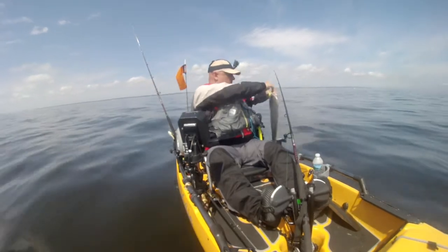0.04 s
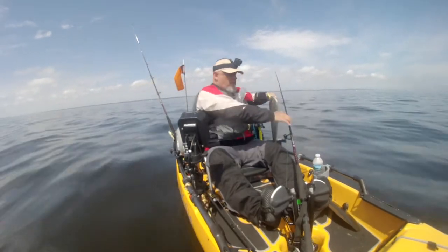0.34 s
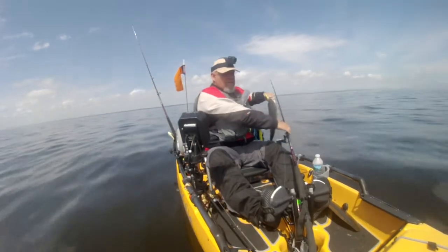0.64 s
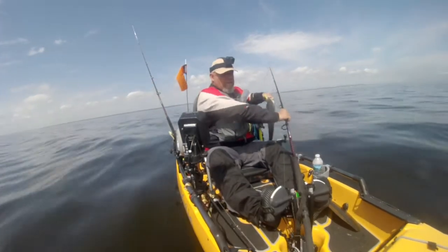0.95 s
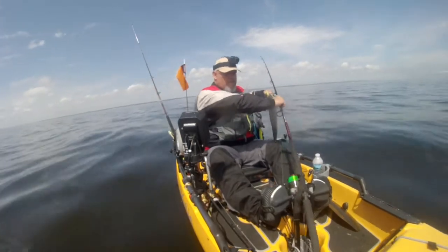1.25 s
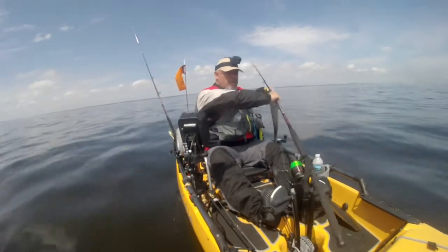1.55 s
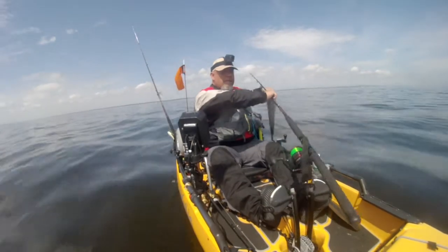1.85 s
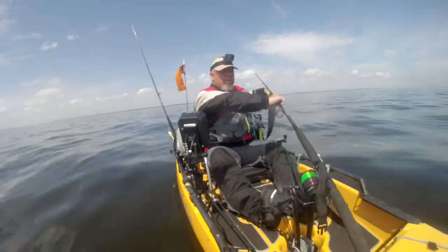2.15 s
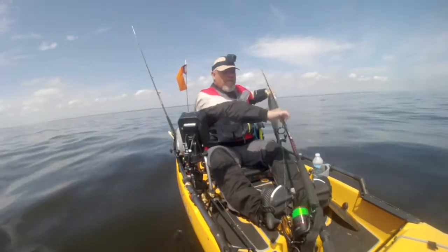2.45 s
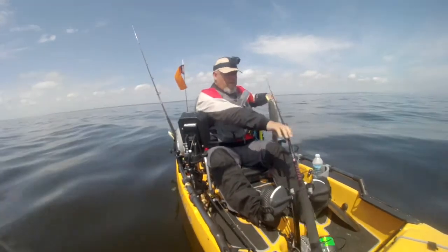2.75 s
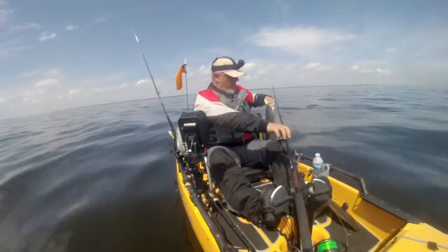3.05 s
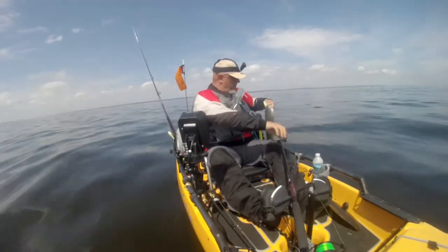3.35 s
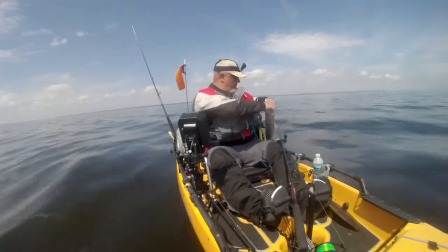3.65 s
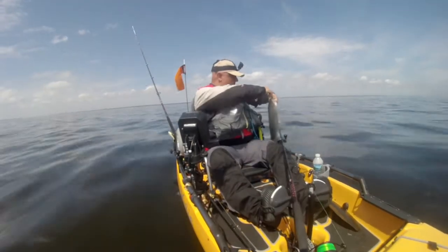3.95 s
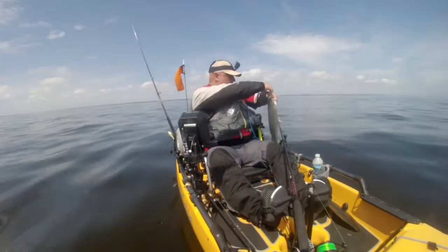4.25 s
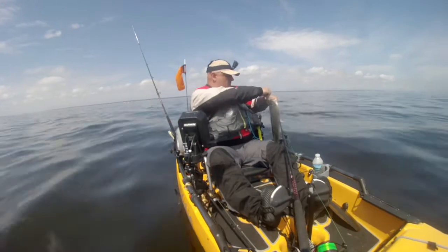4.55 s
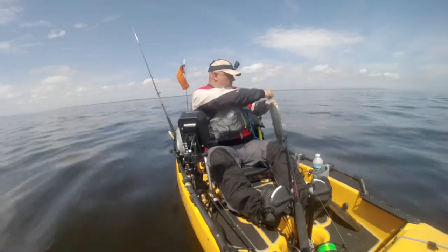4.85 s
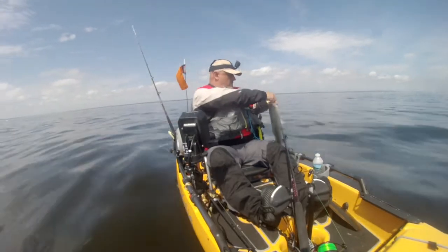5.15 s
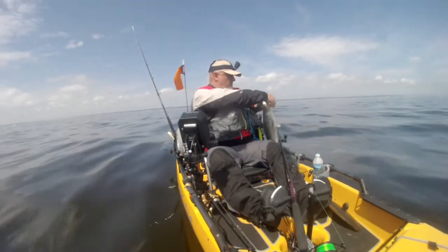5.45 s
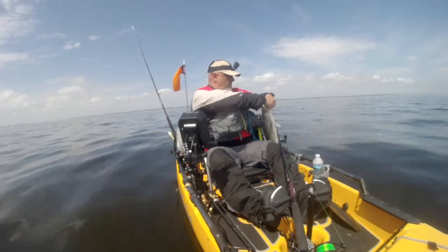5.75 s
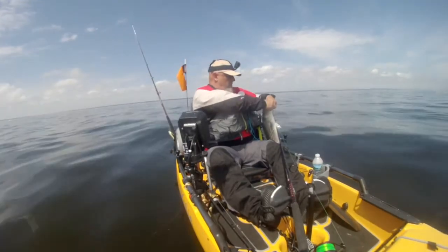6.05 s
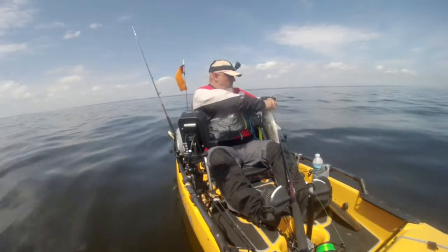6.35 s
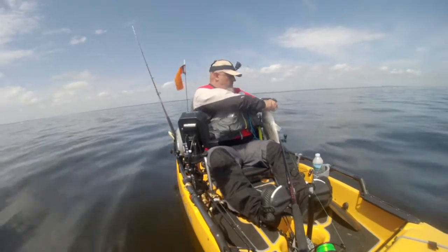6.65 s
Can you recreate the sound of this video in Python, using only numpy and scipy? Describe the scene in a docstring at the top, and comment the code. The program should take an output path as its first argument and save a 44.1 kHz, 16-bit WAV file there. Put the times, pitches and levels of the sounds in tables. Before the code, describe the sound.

Hollow knocks, clacks and scrapes of fishing gear against a plastic kayak, thinning to light taps and creaks over faint ripples.

```python
"""Hollow thuds and sharp clacks sound from a plastic kayak on calm water, as an angler holding a fish
shifts a rod and gear about. Each knock excites the damped modes of hull, deck and fittings and travels
up a swaying pole into a closed camera housing. Between the blows, gear and clothing rub on the boat,
grips creak by stick-slip friction and loose tackle rattles, over a faint wash of ripples."""
import sys
import numpy as np
from scipy import signal
from scipy.fft import rfft, irfft, next_fast_len
from scipy.io import wavfile
from scipy.ndimage import uniform_filter1d, map_coordinates

SR = 44100
rng = np.random.default_rng(int(sys.argv[2]) if len(sys.argv) > 2 else 0)


def wav_record(signal):
    """Record a signal, one row per channel, as 16-bit PCM in the file named by sys.argv[1]."""
    frames = np.transpose(np.atleast_2d(signal))
    bounded = np.clip(frames, -1, 1)
    # unit amplitude maps onto the largest positive 16-bit level
    quanta = np.round(bounded * 32767).astype(np.int16)
    wavfile.write(sys.argv[1], SR, quanta)


N = 295470

# Spectra of the noises. Each row: frequency in Hz, relative spectral level in dB.
AIR_SPECTRUM = [(18, -33), (30, -5), (46, 1), (75, -11.5), (138, -7), (199, -4.5), (239, -22), (355, -18),
                (569, -20), (2170, -29), (2610, -27.5), (4650, -33.5), (11700, -37.5), (14800, -42),
                (16000, -57)]
RUMBLE_SPECTRUM = [(30, -9), (62, 6.5), (100, 5.5), (150, -0.5), (210, -1), (285, 1.5), (340, -23.5),
                   (410, -9.5), (520, -33.5), (1000, -46), (3000, -84.5)]
TACKLE_SPECTRUM = [(1500, -42), (3000, -11), (4800, -3.5), (5900, -3), (7000, -17.5), (8200, -4),
                   (9500, -7.5), (11500, -2.5), (13000, -13), (15500, -15)]
SCRAPE_SPECTRUM = [(250, -11), (450, -5), (600, 1), (850, 0.5), (1050, -8.5), (1250, 1), (1480, -10),
                   (1750, -21.5), (3500, -34), (15000, -56.5)]
RASP_SPECTRUM = [(900, 9), (1700, 10), (2150, -16), (2750, 12), (3100, 4), (3500, -36), (6000, -25.5),
                 (10000, -28), (15000, -39)]
CRACK_SPECTRUM = [(1000, -42.5), (2000, -11.5), (2700, 4.5), (3500, -15), (4500, -5), (6000, -6.5),
                  (7200, -10.5), (9000, -14.5), (11400, -12), (15500, -25)]
# Normal modes. Each row: frequency in Hz, relative level in dB, time to decay by 60 dB in seconds.
HULL_MODES = [(74.2, -14, 0.26), (89, -12.5, 0.06), (125.74, -19, .12), (159.55, -0.5, 0.28),
              (185.9, -6, 0.2), (213, -20.5, .14), (239, -15, 0.21), (273, -17.5, 0.13), (278, -6, 0.17),
              (394, -7.5, .085)]
DECK_MODES = [(534, -5, 0.015), (575, -4.5, 0.044), (650, 2.5, .022), (735, 1.5, .032), (833, -2, .024),
              (867, -6.5, 0.034), (578.3, -33.5, 0.12), (910, -22.5, 0.15)]
HOUSING_MODES = [(960, -19.5, .022), (1127, -1, 0.055), (1192, 9.5, .024), (1277, 9.5, 0.019),
                 (1410, -6, 0.016), (1680, -8, 0.006)]
FITTING_MODES = [(1798, 7, .018), (1990, -12, 0.1), (2440, 9, 0.0097), (2670, 4.5, 0.013),
                 (3020, -4.5, 0.029), (3500, -18.5, 0.036), (4177, -19.5, .014), (4730, -15.5, 0.02),
                 (5755, -16, 0.019)]
# Shoves that rock the camera pole. Each row: start in seconds, swing level in dB.
POLE_SHOVES = [(.5, -38), (.8, -31.5), (1.3, -27.5), (1.58, -27.5), (2.41, -17.5), (2.88, -17), (3.47, -15),
               (4.739, -30)]
# Loose tackle shaken by blows. Each row: middle and half length in seconds, level in dB.
TACKLE_RATTLES = [(0.895, 0.0067, -55), (2.413, 0.014, -54), (2.509, 0.0052, -54.5), (2.827, 0.015, -56.5),
                  (2.88, 0.014, -52.5), (3.096, 0.013, -67.5), (3.519, 0.0074, -66)]
# Creaks of plastic and rod grips. Each row: middle and half length in seconds, level in dB, pitch in Hz.
GRIP_CREAKS = [(1.392, 0.0084, -48, 1100), (1.417, 0.0053, -50, 1110), (1.444, 0.005, -44, 1050),
               (2.803, 0.011, -42, 2710), (3.095, 0.0038, -32, 1274), (3.099, 0.011, -41.5, 2700),
               (3.169, 0.0065, -50.5, 2700), (3.178, 0.019, -50.5, 1210), (3.432, 0.048, -63.5, 2620),
               (4.174, 0.013, -45, 1130), (5.37, 0.074, -65, 1250), (5.656, 0.0072, -53.5, 1190),
               (6.448, 0.019, -67, 1276)]
# Gear and clothing dragged over the boat.
# Each row: middle and half length in seconds, scrape level in dB, rumble level in dB.
GEAR_RUBS = [(0.844, 0.011, -61.5, -48.5), (1.397, 0.06, -65, -36.5), (2.617, 0.044, -53, -28),
             (2.725, 0.026, -39, -31.5), (2.808, 0.014, -35, -13.5), (2.869, 0.063, -46, -24),
             (3.11, 0.017, -42, -39), (3.199, 0.077, -57.5, -35.5), (3.441, 0.055, -48, -34),
             (3.493, 0.026, -42, -20.5), (3.594, 0.056, -48.5, -24.5), (4.245, 0.3, -68.5, -51),
             (4.663, .02, -64, -31.5), (4.853, 0.13, -68, -44.5), (5.438, 0.062, -75, -51),
             (5.903, 0.052, -70, -42.5), (6.117, 0.01, -80, -44.5), (6.695, 0.027, -57, -34.5)]
# Light taps of rod and gear. Each row: start in seconds, relative levels of clack and click in dB.
LIGHT_TAPS = [(2.759, -34, -42.5), (2.9926, -31, -37.5), (3.045, -43.5, -52), (3.086, -35, -37),
              (3.161, -39.5, -54), (3.8907, -42, -53.5), (4.6474, -35.5, -46.5), (4.6682, -43.5, -56),
              (4.8022, -39.5, -53.5), (6.668, -35.5, -49)]
# Heavy blows on the boat. Each row: start in seconds, relative thud level in dB, thud pitch in Hz,
# then relative levels of deck knock, housing clack and fitting click in dB.
HEAVY_KNOCKS = [ (0.055, -32.5, 230, -62, -75, -67), (.87, -7, 259.5, -19.5, -26, -38.5),
                (1.242, -26, 202, -34.5, -35, -40), (1.326, -19.5, 205, -36.5, -29, -47),
                (1.453, -21.5, 205, -61, -45, -70), (1.582, -26, 253, -41, -48, -72),
                (2.394, -4.5, 212, -5, -12, -30), (2.4941, -12, 212, -25.5, -37.5, -60),
                (2.588, -20.5, 185, -42, -72, -68), (2.688, -15.5, 197, -34, -50, -63),
                (2.7884, -10.5, 225, -20.5, -19, -33.5), (2.8133, -13, 143, -24, -47, -45),
                (2.8592, -12.5, 206, -17.5, -17.5, -38.5), (2.8858, -12.5, 159, -31, -56.5, -54),
                (3.4433, -24, 276, -37, -30, -45), (3.469, -20, 281, -26.5, -20.5, -24),
                (3.4894, -22, 137, -23, -23.5, -46.5), (3.5252, -31, 143, -27, -25.5, -49),
                (3.571, -34, 192, -35, -32, -47), (3.6018, -26, 179, -46, -38, -52)]


def amp(db):
    """Amplitude ratio of a level in dB."""
    return 10 ** (np.asarray(db) / 20)


def unit(x):
    """x at rms 1."""
    return x / np.sqrt(np.mean(x ** 2) + 1e-20)


def at_level(x, db):
    """x with its loudest 4 ms at db."""
    return x * amp(db) / np.sqrt(np.max(uniform_filter1d(x ** 2, size=176)) + 1e-20)


def since(start):
    """Seconds since start at each sample, 0 before it."""
    return np.maximum(np.arange(N) / SR - start, 0)


def rise(t, seconds):
    """A smooth build-up from 0 to 1."""
    return 1 - np.exp(-(t / seconds) ** 2)


def fade(t, t60):
    """Exponential decay by 60 dB in t60 seconds."""
    return np.exp(-np.log(1000) * t / t60)


def swell(middle, half):
    """A Gaussian envelope of height 1."""
    return np.exp(-.5 * ((np.arange(N) / SR - middle) / half) ** 2)


def wobble(rate):
    """A smooth random curve, rate knots a second."""
    return map_coordinates(rng.standard_normal(int(N * rate / SR) + 4), [np.arange(N) * rate / SR])


def slips(rate, spread_db):
    """A Poisson train of uneven impulses, rate a second."""
    impulses = (rng.random(N) < rate / SR) * rng.choice([-1, 1], N)
    return impulses * amp(spread_db * np.clip(rng.standard_normal(N), -2, 2))


def coloured(x, spectrum):
    """x filtered by a spectral envelope, at rms 1."""
    hz, db = np.transpose(spectrum)
    bins_hz = np.fft.rfftfreq(len(x), 1 / SR)
    gain = amp(np.interp(np.log(bins_hz + 1), np.log(hz), db))
    return unit(irfft(rfft(x) * gain, len(x)))


def band(x, lo_hz, hi_hz, order=3):
    """Causal band-pass."""
    return signal.sosfilt(signal.butter(order, [lo_hz, hi_hz], "band", fs=SR, output="sos"), x)


def placed(sounds):
    """(start in seconds, sound) pairs summed on one track."""
    track = np.zeros(N + SR)
    for start, sound in sounds:
        track[round(start * SR):][:len(sound)] += sound
    return track[:N]


def air():
    """Stationary noise: the faint wash of open water and microphone hiss."""
    return amp(-58.5) * coloured(rng.standard_normal(N), AIR_SPECTRUM)


def ripples():
    """Amplitude-modulated noise: small waves murmur against the hull."""
    return coloured(rng.standard_normal(N), RUMBLE_SPECTRUM) * amp(-57.5 + 3.4 * wobble(16))


def pole():
    """Free vibration: each shove sets the camera pole swinging in its lowest, lightly damped mode."""
    shove_power = sum((amp(db) * rise(since(start), 0.06) * fade(since(start), t60=2.02)) ** 2
                      for start, db in POLE_SHOVES)
    wave_power = amp(-56) ** 2  # the waves keep up a slight swing
    hz = 22.3 + 0.43 * wobble(5.9)
    return np.sqrt(shove_power + wave_power) * unit(np.sin(2 * np.pi * np.cumsum(hz) / SR))


def rattle():
    """Random collisions: loose tackle jumps and ticks in short bursts."""
    shaking = sum(amp(db) * swell(middle, half) for middle, half, db in TACKLE_RATTLES)
    return coloured(slips(rate=200, spread_db=4), TACKLE_SPECTRUM) * shaking


def creaks(relative_bandwidth=0.17):
    """Stick-slip friction at a tight contact drives one narrow resonance per creak."""
    drag = slips(rate=970, spread_db=2.5)
    lower, upper = 1 - relative_bandwidth / 2, 1 + relative_bandwidth / 2
    return sum(amp(db) * swell(middle, half) * unit(band(drag, hz * lower, hz * upper, order=2))
               for middle, half, db, hz in GRIP_CREAKS)


def rubbing():
    """Sliding friction: the same tiny slips scrape the deck and rasp the fittings; the hull rumbles."""
    power = sum((amp(levels_db)[:, None] * swell(middle, half)) ** 2
                for middle, half, *levels_db in GEAR_RUBS)
    scrape_envelope, rumble_envelope = np.sqrt(power)
    drag = unit(slips(rate=1700, spread_db=2) * amp(4.7 * wobble(70)))  # the grip catches and lets go
    scrape = coloured(drag, SCRAPE_SPECTRUM)
    rasp = amp(-17.5) * coloured(drag, RASP_SPECTRUM)
    rumble = coloured(rng.standard_normal(N), RUMBLE_SPECTRUM)
    return (scrape + rasp) * scrape_envelope + rumble * rumble_envelope


def ring(modes, t, scatter_db, weight_db=0):
    """Modal superposition: damped sinusoids whose strengths vary from strike to strike."""
    hz, db, t60 = np.transpose(modes)
    gain = amp(db + weight_db + scatter_db * rng.standard_normal(len(hz)))
    hz = hz * (1 + .007 * rng.standard_normal(len(hz)))  # the load detunes each mode a little
    return gain @ (np.sin(2 * np.pi * hz[:, None] * t) * fade(t, t60[:, None]))


def contact(t, chatter):
    """Contact force: surfaces graze, meet in one impulse, then chatter as they settle."""
    force = rng.standard_normal(len(t)) * rise(t, 0.0018) * fade(t, t60=0.045)
    force *= chatter / np.linalg.norm(force)
    force[round(.0015 * SR)] += 1
    return force


def struck(modes, force, t):
    """Forced response: the contact force convolved with a body's impulse response."""
    return signal.fftconvolve(force, ring(modes, t, scatter_db=6))[:len(t)]


def hull(t, thud_db, thud_hz):
    """Sympathetic resonance: a panel thuds and the hollow shell swells after it, most near that pitch."""
    thud = np.sin(2 * np.pi * thud_hz * t) * rise(t, 0.00088) * fade(t, t60=0.073)
    octaves_away = np.abs(np.log2(np.transpose(HULL_MODES)[0] / thud_hz))
    coupling_db = -9 * np.minimum(octaves_away, .75)
    shell = ring(HULL_MODES, t, scatter_db=5, weight_db=coupling_db) * rise(t, 0.019)
    shell_db = -10.5 + 0.67 * thud_db
    return at_level(band(thud, 62, 470), thud_db - .5) + at_level(shell, shell_db)


def blow(thud_db, thud_hz, deck_db, clack_db, click_db, chatter):
    """Impact excitation: one contact sounds hull, deck, housing and fittings; hard ones crack brighter."""
    t = np.arange(SR // 2) / SR
    force = contact(t, chatter)
    deck = at_level(band(struck(DECK_MODES, force, t), 510, 1000), deck_db - .8)
    clack = at_level(band(struck(HOUSING_MODES, force, t), 642, 1550), clack_db - .8)
    click = at_level(band(struck(FITTING_MODES, force, t), 1900, 14000), click_db - 3.5)
    crack = coloured(rng.standard_normal(len(t)), CRACK_SPECTRUM) * rise(t, .0015) * fade(t, t60=.018)
    crack_db = 7 + 1.47 * click_db + 0.28 * thud_db
    return hull(t, thud_db, thud_hz) + deck + clack + click + at_level(crack, crack_db)


def taps():
    """Weak impacts: rod and gear clack in the housing and stir hull and deck only lightly."""
    return placed((start, blow(thud_db=clack_db - 1, thud_hz=220.4, deck_db=clack_db - 11,
                               clack_db=clack_db, click_db=click_db, chatter=0.43))
                  for start, clack_db, click_db in LIGHT_TAPS)


def knocks():
    """Heavy impacts: the firmer the blow, the nearer its force is to one impulse; weak ones chatter."""
    return placed((start, blow(thud_db, *timbre, chatter=np.clip(1 - 1.1 * amp(thud_db), .1, 1)))
                  for start, thud_db, *timbre in HEAVY_KNOCKS)


def scene():
    """Linear superposition: all sources add at one microphone."""
    return (knocks() + taps() + rubbing() + creaks() + rattle() + pole() + ripples() + air())[None]


def record(dry):
    """Saturation and band limiting: the camera clips at full scale and cuts the highest treble."""
    clipped = np.clip(dry, -1, 1)
    size = next_fast_len(N + SR // 2)
    passband = np.fft.rfftfreq(size, 1 / SR) < 15700  # Hz
    return irfft(rfft(clipped, size) * passband, size)[:, :N]


dry = scene()
out = record(dry)
wav_record(out)
```